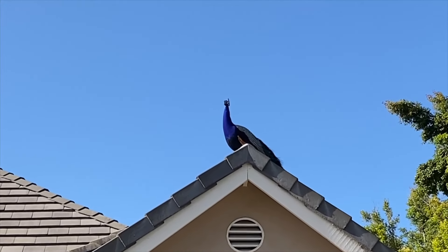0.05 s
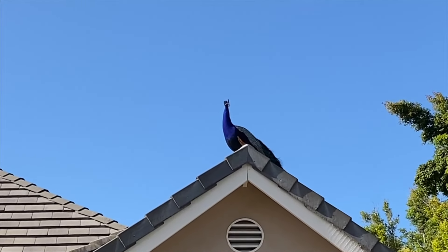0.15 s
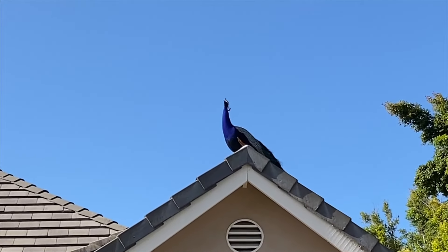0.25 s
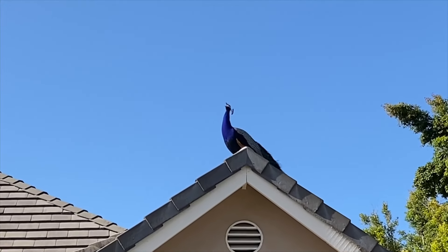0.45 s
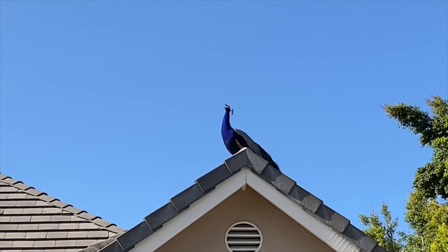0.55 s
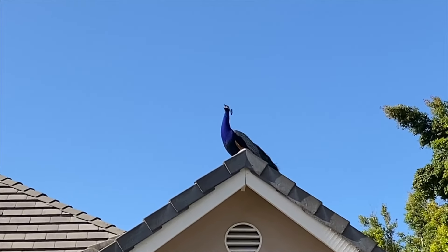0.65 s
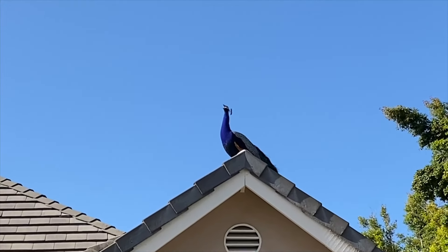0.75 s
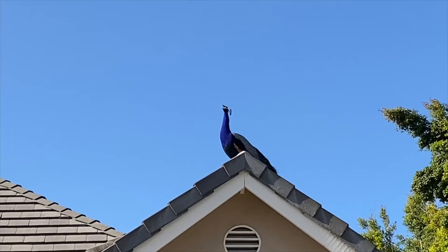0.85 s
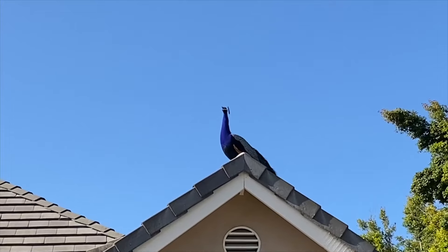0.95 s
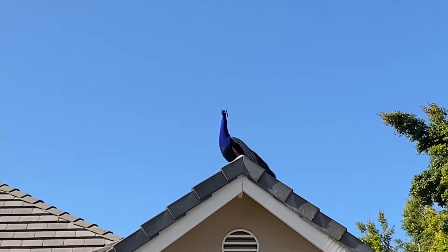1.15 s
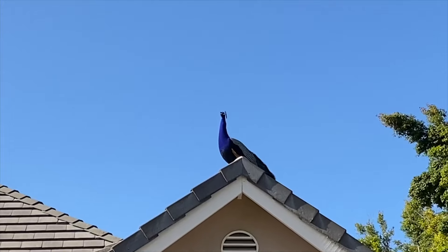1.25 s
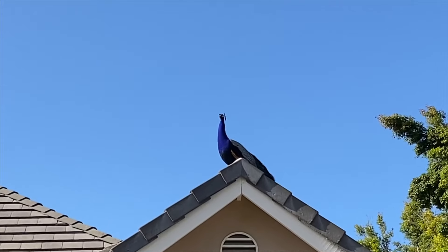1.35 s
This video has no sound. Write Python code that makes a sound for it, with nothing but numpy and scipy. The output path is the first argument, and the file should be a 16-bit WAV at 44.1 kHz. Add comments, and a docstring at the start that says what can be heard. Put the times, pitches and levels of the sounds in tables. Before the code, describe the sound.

A single loud peacock wail from a roof ridge swoops up then down, bright turning hollow, followed by a house echo and fading tail, over faint hiss and distant engine hum; heard outdoors, nearly centred.

```python
"""One long wail of a peacock on a roof ridge arches up and down in pitch, turning from bright to hollow.
Its voice is a harmonic series shaped by two moving throat resonances, with rasp puffed once a cycle.
Roof reflections, one echo off the house opposite and a decaying diffuse tail follow by delay and convolution.
Behind it lie a distant engine's hum (wavering sines), low rumble and soft hiss (filtered noise),
and one faint chirp of a small bird (a gliding sine)."""
import sys
import numpy as np
from scipy import signal
from scipy.fft import rfft, irfft
from scipy.io import wavfile

SR = 44100
rng = np.random.default_rng(int(sys.argv[2]) if len(sys.argv) > 2 else 0)


def waveform_to_disk(signal):
    """Save audio, clipped to [-1, 1], as 16-bit WAV at the path in sys.argv[1]."""
    frames = np.transpose(np.atleast_2d(signal))
    scaled = np.clip(frames, -1, 1) * 32767
    samples = np.round(scaled).astype(np.int16)
    wavfile.write(sys.argv[1], SR, samples)


N = 61739
T = np.arange(N) / SR  # time in s
THROAT_WIDTH_HZ = 358.5


def peacock(count=28):
    """Source and filter: harmonics of one gliding pitch are weighted by moving throat resonances."""
    # pitch of the wail: time_s, pitch_hz
    pitch_course = [(0.18, 581.6), (0.2, 594.1), (0.235, 621.7), (0.275, 647.8), (0.305, 666.6),
                    (0.355, 677.9), (0.41, 706.9), (0.445, 723.0), (0.475, 727.8), (0.505, 729.9),
                    (0.56, 716.2), (0.62, 703.1), (0.7, 672.1), (0.79, 633.9), (0.85, 607.7), (0.88, 588.5),
                    (0.915, 547.3)]
    # course of the voice: time_s, fundamental_db, throat_hz, throat_peak_db, relative_treble_db
    wail_course = [(0.183, -46, 2060, -27.5, -47), (0.215, -35.0, 2233, -15, -36.5),
                   (0.25, -36.5, 1990, -22, -31.5), (0.275, -32.5, 2433, -10, -34.0),
                   (0.33, -31.5, 2040, -16.5, -33), (0.4, -28.0, 1790, -14.5, -37),
                   (0.46, -35.5, 1775, -11, -38.0), (0.515, -36.5, 1490, -14.0, -42.5),
                   (0.56, -36, 1420, -12.5, -43), (0.63, -27, 1240, -11, -45.5),
                   (0.74, -36.0, 1364, -19, -52.5), (0.795, -37.0, 1344, -17.0, -44.0),
                   (0.88, -43, 1433, -28.0, -45.5), (0.915, -59.0, 1450.0, -31, -57)]
    # upper throat resonance: time_s, centre_hz, peak_db
    upper_course = [(0.183, 3570, -52.0), (0.22, 3640, -31), (0.27, 3230, -30.5), (0.32, 4041.0, -36.5),
                    (0.41, 4525, -21.5), (0.52, 3990, -54), (0.63, 3650, -40.5), (0.73, 3520, -29.0),
                    (0.85, 3590, -40), (0.915, 3720, -41.5)]
    # colour of the overtones: frequency_hz, relative_level_db
    treble_colour = [(1200, 8), (2000, -26), (2800, 11.5), (3450, -9.5), (4200, 1.5), (5200, -1),
                     (6300, -3), (7500, -10), (8400, -9.5), (9150, -20), (10200, -19), (11500, -30),
                     (13400, -32.5), (15000, -20), (16000, -38)]
    # extra level of the highest overtones: time_s, change_db
    shrill_course = [(.19, 6.5), (.26, -5.5), (.33, 2), (.45, -1), (.52, 4), (.57, 11), (.63, 5),
                     (.72, 10.5), (.81, 4), (.9, -3)]
    shrill_from_hz = 7500
    jitter, shimmer, irregularity_hz = .0006, .007, 90  # rms fractions of pitch and amplitude; their rate
    flutter_db, flutter_hz = 3, 26  # the upper overtones fade in and out one by one
    build_s_per_khz = .0018  # higher overtones take longer to build up
    start_s, end_s, attack_s, release_s = pitch_course[0][0], .911, .0045, .0052
    drop_at_s, drop_s, drop_db = .5175, .002, -3.1  # step down just after the top of the arch

    pitch, = curves(pitch_course)
    shrill_db, = curves(shrill_course)
    low_db, throat_hz, throat_db, treble_db = curves(wail_course)
    upper_hz, upper_db = curves(upper_course)
    unsteady_pitch = pitch * (1 + jitter * wander(irregularity_hz))
    phase = 2 * np.pi * np.cumsum(unsteady_pitch) / SR
    voice = amp(low_db) * np.cos(phase)
    for k in range(2, count):
        hz = k * pitch
        throat = resonance(hz, throat_hz, throat_db) + resonance(hz, upper_hz, upper_db)
        # the phase turns as a harmonic crosses each resonance
        throat_lag = 2 * np.arctan((hz - throat_hz) / THROAT_WIDTH_HZ)
        upper_lag = np.arctan((hz - upper_hz) / THROAT_WIDTH_HZ)
        shrill = shrill_db * np.clip((hz - shrill_from_hz) / pitch + .5, 0, 1)
        flutter = flutter_db * (k > 6) * wander(flutter_hz)
        overtone = amp(treble_db + read(treble_colour, hz) + shrill + flutter)
        build = np.clip((T - start_s) / (build_s_per_khz * hz / 1000), 0, 1)
        harmonic = (throat + overtone) * np.cos(k * phase - throat_lag - upper_lag)
        voice += build * harmonic * (1 + shimmer * wander(irregularity_hz))
    voice += rasp(phase)
    attack = np.clip((T - start_s) / attack_s, 0, 1)
    release = np.clip((end_s - T) / release_s, 0, 1)
    drop = amp(drop_db * np.clip((T - drop_at_s) / drop_s, 0, 1))
    return voice * attack * release * drop


def resonance(hz, centre_hz, db):
    """Resonance: the gain peaks at the centre and falls away symmetrically on both sides."""
    return amp(db) / (1 + ((hz - centre_hz) / THROAT_WIDTH_HZ) ** 2) ** 1.59


def rasp(phase):
    """Amplitude modulation: turbulent noise swells once in each cycle of the voice."""
    # hoarseness: time_s, level_db
    rasp_course = [(.18, -47), (.22, -51), (.3, -56), (.37, -53), (.43, -45), (.5, -45), (.55, -58),
                   (.7, -63), (.86, -57), (.92, -64)]
    # spectrum of the rasp: frequency_hz, relative_level_db
    rasp_colour = [(300, -50), (900, -38), (1400, -1), (2000, -15), (2750, -7), (3350, -30), (4200, -13),
                   (4600, -28), (5200, -4), (6500, -10), (8200, -25), (9200, -7), (10500, -20),
                   (13400, -24), (15500, -24)]
    puffs = rng.standard_normal(N) * (1 + np.cos(phase))
    return amp(curves(rasp_course)[0]) * unit(colour(puffs, rasp_colour))


def street(call):
    """Superposition of paths: direct sound, roof reflections, one distinct echo and a diffuse tail."""
    # reflections off the roof: delay_ms, gain (negative inverts)
    roof = [(2.992, -0.115), (3.278, -0.083), (4.833, 0.248), (4.941, 0.474), (5.057, -0.148),
            (5.569, -0.085), (9.75, 0.051)]
    # echo off the house opposite: frequency_hz, gain_db
    echo_colour = [(600, -32), (1300, -25), (1850, -24), (3300, -16), (4500, -19), (5600, -25.5),
                   (7000, -22), (12000, -35)]
    near = call + sum(gain * delayed(call, ms / 1000) for ms, gain in roof)
    echo = colour(delayed(call, .1908), echo_colour)
    late_call = delayed(call, .045)
    tail = signal.fftconvolve(late_call[None], street_response(), axes=1)[:, :N]
    return near + echo + tail


def street_response():
    """Exponential decay: a diffuse impulse response is noise losing 60 dB per t60 in each band."""
    # reverberation of the street: frequency_hz, level_db, t60_s
    reverberation = [(500, -18, 1.3), (1296, -12, 1.176), (2000, -20, .9), (3480, -17, 0.86),
                     (7000, -20.5, 0.42), (15200, -31.5, 0.29)]
    hz, s, bands = signal.stft(pair(.4), SR, nperseg=256)
    level = amp(read(reverberation, hz)[:, None])
    t60 = read(reverberation, hz, axis=2)[:, None]
    decay = np.exp(-np.log(1000) * s / t60)
    equal_energy = np.sqrt(2 * np.log(1000) / (t60 * SR))  # keeps the level independent of t60
    return signal.istft(bands * level * decay * equal_energy, SR)[1][:, :N]


def ports(x):
    """Interchannel phase: two microphone ports hear the call out of step, most of all at the top."""
    # phase by which the left port leads the right: frequency_hz, lead_rad
    port_lead = [(100, 0), (690, .35), (1460, .14), (2400, .3), (3200, .2), (4500, .1), (7200, -.1),
                 (8270, -2.1), (9650, -3.9), (10500, -5.6), (11900, -6.6), (12600, -9), (14000, -10.1),
                 (15500, -12.3)]
    lead = read(port_lead, np.fft.rfftfreq(2 * N, 1 / SR))
    return irfft(rfft(x, 2 * N) * np.exp(.5j * np.array([lead, -lead])))[:, :N]


def small_bird(start, length, from_hz, to_hz, arch_hz, db):
    """Frequency modulation: one sine follows an arched glide under a half-sine envelope."""
    u = np.clip((T - start) / length, 0, 1)
    arch = np.sin(np.pi * u)
    pitch = from_hz + (to_hz - from_hz) * u + arch_hz * arch
    return amp(db) * arch * np.sin(2 * np.pi * np.cumsum(pitch) / SR)


def background():
    """Superposition: hiss and hum share one slow level course; the rumble follows its own."""
    # level of hiss and hum: time_s, change_db
    background_course = [(0, 2), (.25, 4.5), (.4, -2), (.75, -6.5), (.95, 0.5), (1.4, -2)]
    return (hiss() + engine_hum()) * amp(curves(background_course)[0]) + rumble()


def engine_hum():
    """Line spectrum: a distant engine's sines share one pitch drift and waver separately in level."""
    # lines of the engine: frequency_hz, relative_level_db
    engine_lines = [(49, -58), (148, -59), (196, -55.5), (246, -59), (293, -67.5)]
    drift = 1 + .009 * wander(8)
    hum = np.zeros(N)
    for hz, db in engine_lines:
        cycles = np.cumsum(hz * drift) / SR + rng.random()
        waver = 1 + .14 * wander(17)
        hum += amp(db) * np.sqrt(2) * waver * np.sin(2 * np.pi * cycles)
    return hum


def rumble():
    """Filtered noise: low random rumble, identical in both channels."""
    # course of the rumble: time_s, level_db
    rumble_course = [(0, -59), (.95, -51), (1.1, -41), (1.19, -55.5), (1.3, -47.5), (1.38, -39.5)]
    # spectrum of the rumble: frequency_hz, relative_level_db
    rumble_colour = [(20, -33), (32, -18), (47, 5.5), (65, -5), (110, -28), (400, -68.5)]
    return amp(curves(rumble_course)[0]) * unit(colour(pair(1.0), rumble_colour))


def hiss():
    """Filtered noise: partly correlated outdoor hiss with a falling treble."""
    # spectrum of the air: frequency_hz, relative_level_db
    air_colour = [(20, -35), (32, -24.5), (50, -10), (75, -4), (114, -10.5), (195, -10), (270, -14),
                  (420, -19.5), (650, -26), (1230, -24.5), (1560, -22.5), (2480, -28.5), (3160, -32.5),
                  (5000, -41), (8000, -49), (14400, -68), (16000, -81)]
    return amp(-49.5) * unit(colour(pair(.58), air_colour))


def amp(db):
    """Logarithmic level: decibels become an amplitude gain."""
    return 10 ** (np.asarray(db) / 20)


def unit(x):
    """Normalisation: the mean power becomes 1."""
    return x / np.sqrt(np.mean(x ** 2) + 1e-20)


def curves(table):
    """Linear interpolation in time: each column of a timed table, sample by sample."""
    s, *columns = np.transpose(table)
    return [np.interp(T, s, c) for c in columns]


def read(table, hz, axis=1):
    """Interpolation over log frequency: one column of a table."""
    columns = np.transpose(table)
    return np.interp(np.log(hz + 1), np.log(columns[0]), columns[axis])


def colour(x, table):
    """Linear filtering: the spectrum is multiplied by a table of Hz and dB."""
    gain = amp(read(table, np.fft.rfftfreq(2 * N, 1 / SR)))
    return irfft(rfft(x, 2 * N) * gain)[..., :N]


def wander(hz):
    """Low-pass noise: a smooth random course of rms 1, rolling off around the given rate."""
    roll_off = (1 + (np.fft.rfftfreq(N, 1 / SR) / hz) ** 2) ** 2
    return unit(irfft(rfft(rng.standard_normal(N)) / roll_off, N))


def pair(likeness):
    """Interchannel correlation: white noise as a shared part plus a part of opposite sign."""
    a, b = rng.standard_normal((2, N))
    c = np.clip(likeness, 0, 1)
    return np.sqrt((1 + c) / 2) * a + np.sqrt((1 - c) / 2) * np.array([b, -b])


def delayed(x, s):
    """Shift theorem: a delay is a phase lag proportional to frequency."""
    hz = np.fft.rfftfreq(2 * N, 1 / SR)
    return irfft(rfft(x, 2 * N) * np.exp(-2j * np.pi * hz * s))[:N]


def scene():
    """Level panning: the call lies almost central, the background and bird a little to the right."""
    # the bird's chirp: start_s, length_s, from_hz, to_hz, arch_hz, level_db
    chirp = (.11, .048, 3950, 3720, 150, -54)
    call = ports(street(peacock())) * amp([[-.25], [.25]])
    return call + (background() + small_bird(*chirp)) * amp([[-.6], [.6]])


def record(dry):
    """Band limiting: a steep linear-phase low-pass at 15850 Hz."""
    low_pass = signal.firwin(511, 15850, window=("kaiser", 9), fs=SR)
    return signal.oaconvolve(dry, low_pass[None], "same")


dry = scene()
out = record(dry)
waveform_to_disk(out)
```